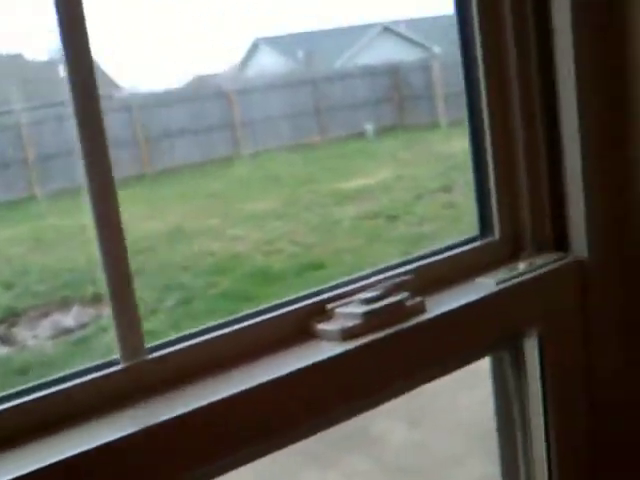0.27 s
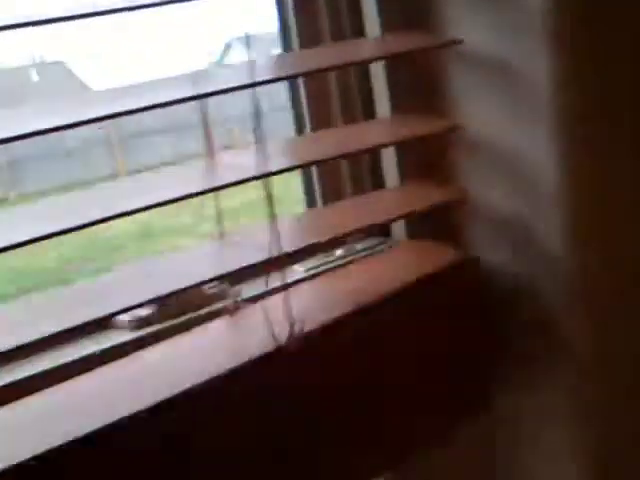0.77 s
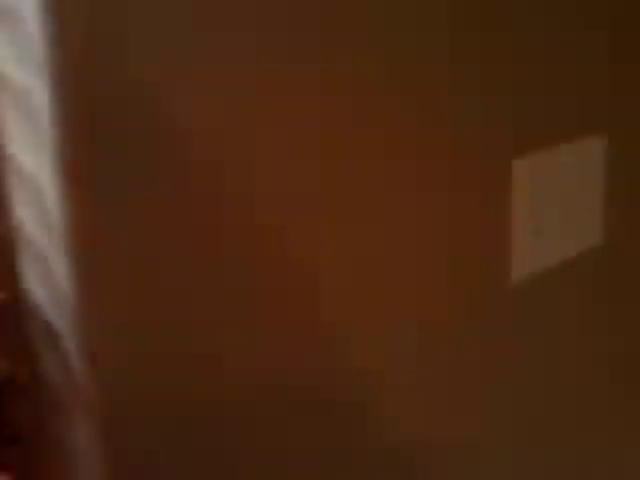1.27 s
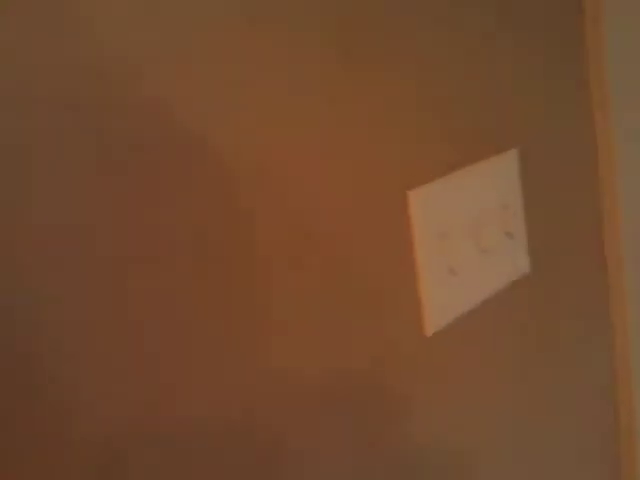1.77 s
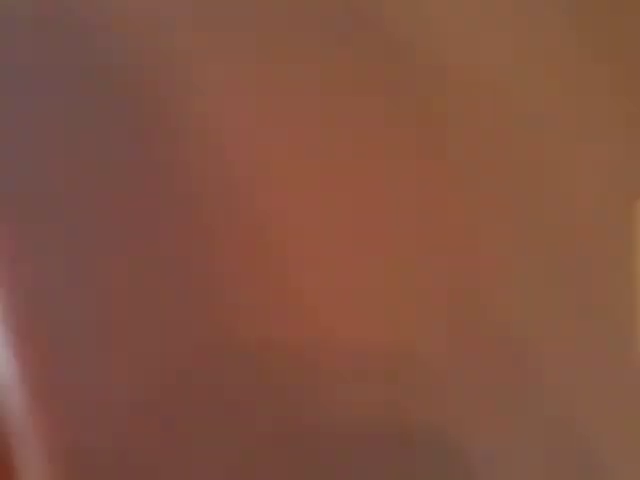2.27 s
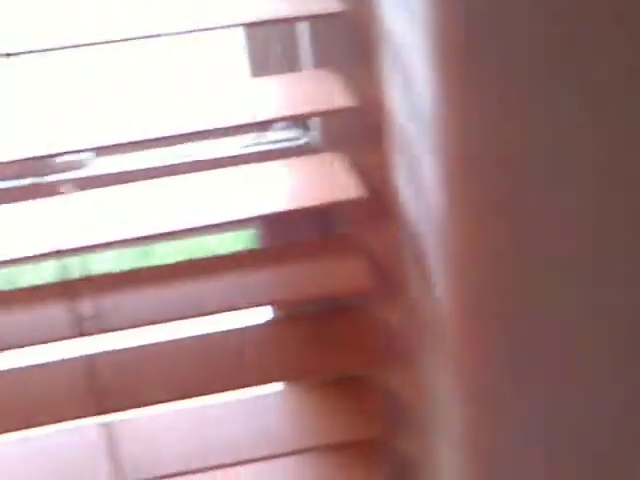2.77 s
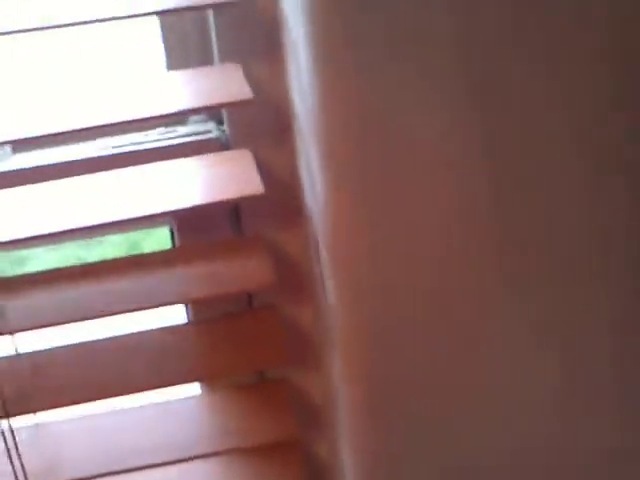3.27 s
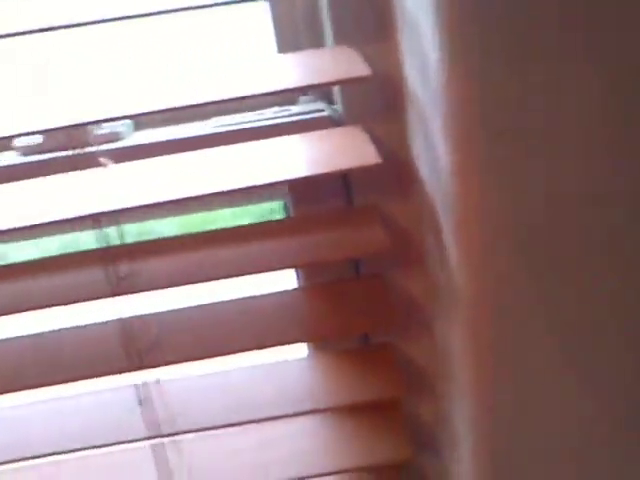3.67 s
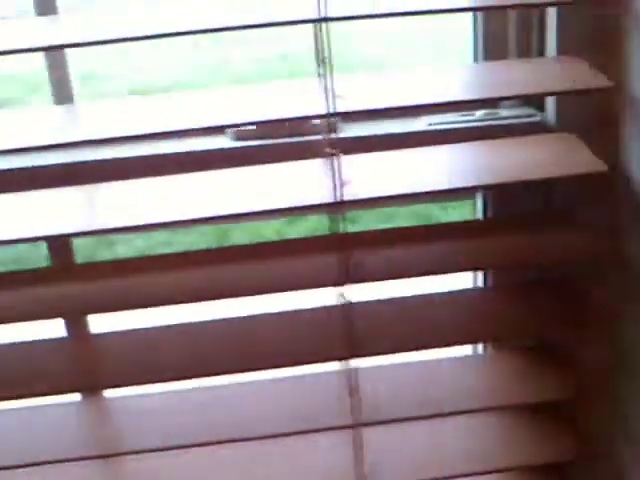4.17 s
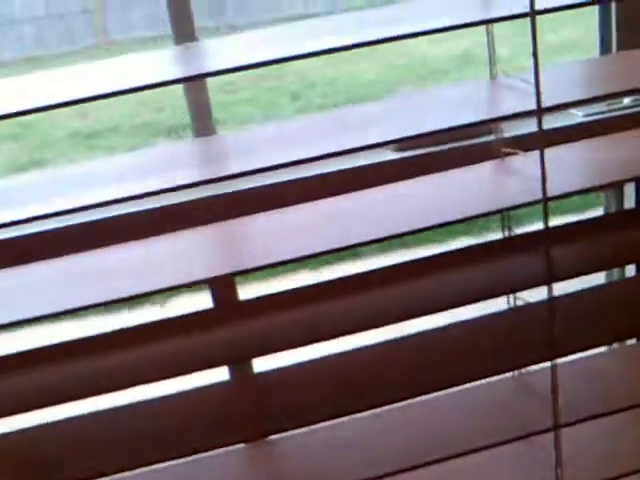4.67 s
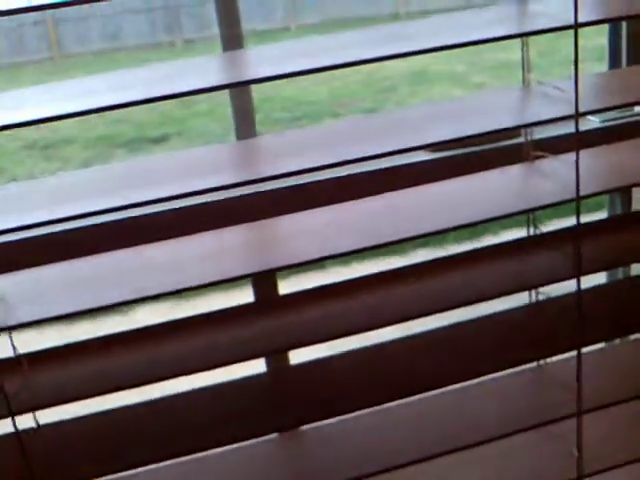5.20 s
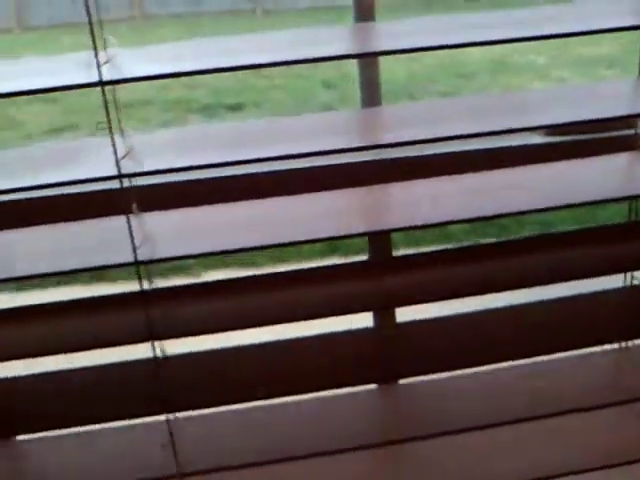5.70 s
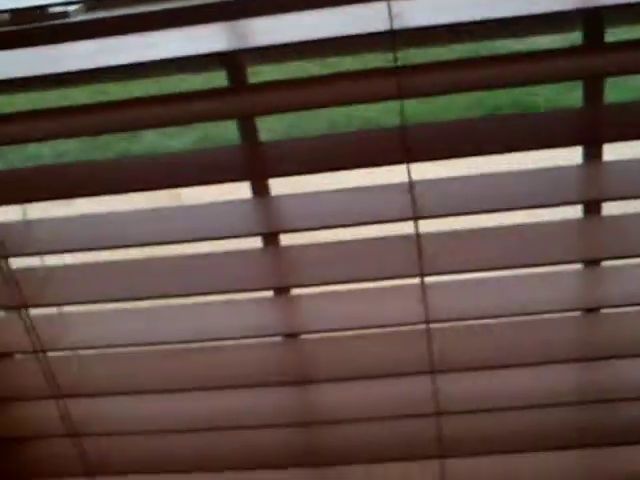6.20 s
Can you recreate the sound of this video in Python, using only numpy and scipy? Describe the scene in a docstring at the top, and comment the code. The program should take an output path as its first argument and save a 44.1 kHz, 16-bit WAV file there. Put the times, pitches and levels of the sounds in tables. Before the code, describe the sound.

Wide-slatted blinds are handled close to the microphone in a bare, echoing room. A long cord pull whirrs up and down with clattering slats, then faint rubbing and metallic clinks. A shorter, rougher pull rattles, lighter rubbing follows, the rail lands with a shiver of slats, and a very loud hard clack bounces quickly before fading into steady hiss.

```python
"""Wide-slatted window blinds are worked by their cord in a small room, close to the microphone.
The braided cord whirrs over its roller and rubs in tiny slips that sound the head rail; rough tones squeal briefly.
Slats tick in short resonant cracks, the metal cord lock clinks with beating modes, dull bumps reach the frame.
The bottom rail lands with a shiver of slats, then the blind is caught with a sharp, bouncing clack.
Bare walls return a dense echo, over steady microphone hiss."""
import sys
import numpy as np
from scipy import signal
from scipy.fft import rfft, irfft, next_fast_len
from scipy.io import wavfile
from scipy.ndimage import uniform_filter1d

SR = 44100
rng = np.random.default_rng(int(sys.argv[2]) if len(sys.argv) > 2 else 0)


def master(y):
    """Save y as 16-bit WAV."""
    cut = np.clip(np.atleast_2d(y).T, -1, 1)
    pcm = np.round(cut * 32767)  # scale
    wavfile.write(sys.argv[1], SR, pcm.astype(np.int16))


N = 284092  # samples
TIME = np.arange(N) / SR  # s
HIT_SIZE = 8192  # samples in one contact


def undb(db):
    """Decibels to gain."""
    return 10 ** (np.asarray(db) / 20)


def unit(x):
    """Scale to rms 1."""
    return x / np.sqrt(np.mean(x ** 2))


def decay(t, t60):
    """Exponential fade that loses 60 dB in t60 seconds."""
    return np.exp(-np.log(1000) * t / t60)


def gains(points, size):
    """Gain of a (Hz, dB) outline at every bin of a transform."""
    hz, db = np.transpose(points)
    log_f = np.log(np.fft.rfftfreq(size, 1 / SR) + 1)
    return undb(np.interp(log_f, np.log(hz), db))


def colour(x, points, resonances=()):
    """Causal filter with a (Hz, dB) outline and (Hz, width in Hz, dB) resonances standing on it."""
    size = 2 * next_fast_len(len(x) // 2 + 1, real=True)
    f = np.fft.rfftfreq(size, 1 / SR)
    peaks = sum(undb(db) / (1 + (2 * (f - hz) / width) ** 2) for hz, width, db in resonances)
    # folding the cepstrum makes every resonance ring after the blow, never before it
    cepstrum = irfft(np.log(gains(points, size) * (1 + peaks)), size)
    cepstrum[1:size // 2] *= 2
    cepstrum[size // 2 + 1:] = 0
    response = np.exp(rfft(cepstrum))
    return irfft(rfft(x, size) * response, size)[:len(x)]


def walk(rate):
    """Smooth chance that changes about rate times a second, rms 1."""
    k = max(int(SR / rate), 1)
    held = np.repeat(rng.standard_normal(N // k + 1), k)
    smooth = uniform_filter1d(uniform_filter1d(held, k), k)
    return unit(smooth[:N])


def swell(s, db):
    """Gain along a level curve, all but silent outside it."""
    return uniform_filter1d(undb(np.interp(TIME, s, db, left=-120, right=-120)), size=600)


def add(track, s, sound):
    """Mix a sound into a track at time s."""
    start = max(int(s * SR), 0)
    track[start:start + len(sound)] += sound[:N - start]


def blow(x):
    """Scale a blow to the energy of one millisecond at full level."""
    return x * np.sqrt(SR / 1000 / np.sum(x ** 2))


def crack(points, snap_t60, resonances=(), ring_t60=.04, ring_share=.2):
    """One contact: a snap and the brief ring of many crowded modes, as coloured, fading noise."""
    t = np.arange(HIT_SIZE) / SR
    fade = decay(t, snap_t60) + ring_share * decay(t, ring_t60)
    return blow(colour(rng.choice([-1, 1], HIT_SIZE) * fade, points, resonances))


def grains(rate, spread_db):
    """Dense tiny contacts of uneven size, about rate a second, rms 1."""
    sizes = undb(spread_db * np.minimum(rng.exponential(size=N), 5))
    happens = rng.random(N) < rate / SR
    return unit(happens * rng.standard_normal(N) * sizes)


def rough_tone(hz, width_hz):
    """A tone whose size and phase wander, rms 1."""
    phase = 2 * np.pi * np.cumsum(hz * np.ones(N)) / SR
    return unit(walk(width_hz) * np.cos(phase) + walk(width_hz) * np.sin(phase))


# Spectrum of the hiss. Each row: frequency in Hz, level in dB.
HISS_COLOUR = [(15, -30), (25, -5.5), (161, -9), (277, -9.5), (416, -6), (489, -7), (641, -5), (2220, -7),
               (2840, -5.5), (7710, -6.5), (8360, -8), (10100, -9), (16000, -12)]


def hiss(level_db=-57.5):
    """Steady microphone hiss over the quiet of the house: coloured noise."""
    return undb(level_db) * unit(colour(rng.standard_normal(N), HISS_COLOUR))


GRIP_S, LET_GO_S = 0.18, 0.097  # the cord takes this long to come under load and to go slack
HAUL_DB, EASE_S = .8, 0.04  # the cord presses harder speeding up, lighter slowing down; ease between them
RUB_DB_PER_OCTAVE, HOLLOW_DB_PER_OCTAVE, WHIRR_DB_PER_OCTAVE = 11, 10.5, 52  # per doubling of cord speed


def stroke(start, fastest, end, top_hz, hz_per_s):
    """One pull: the hand speeds up and slows down evenly. Returns the cord's speed and the load on it (0-1)."""
    # never slower than a tenth of top speed
    speed = np.maximum(top_hz - hz_per_s * np.abs(TIME - fastest), top_hz / 10)
    load = np.clip((TIME - start) / GRIP_S, 0, 1) * np.clip((end - TIME) / LET_GO_S, 0, 1)
    return speed, np.sin(np.pi / 2 * load) ** 2


def drive(motion, db, db_per_octave):
    """Gain of a sound driven by a pull: db at top speed and full load, weaker as the cord slows."""
    speed, load = stroke(*motion)
    fastest = motion[1]
    haul_db = HAUL_DB * np.tanh((fastest - TIME) / EASE_S)
    return load * undb(db + haul_db + db_per_octave * np.log2(speed / speed.max()))


# Pulls of the cord, its speed counted in strands of the braid passing the roller a second. Each row:
# start, fastest moment and end in seconds, top speed in Hz, acceleration in Hz per second, then levels in dB
# of rubbing, hollow head rail and whirr (cord and whirr trim these), jerkiness 0-1.
STROKES = [ (0.063, 0.6, 1.426, 859, 707, -35.5, -40, -32.5, .2),
           (1.41, 1.668, 2.15, 398, 147.2, -53, -61.5, -69.5, 0.96),
           (1.913, 2.093, 2.17, 519, 704, -48, -58.5, -63, 0.96),
           (2.583, 2.722, 2.98, 361, 250, -56.5, -67.5, -83, 0.8),
           (2.925, 3.243, 3.623, 897.6, 1300, -37.5, -45.5, -39, 0.67),
           (4.17, 4.37, 4.53, 798, 600, -50, -58.5, -66, 0.9),
           (4.528, 4.99, 5.1, 923, 348, -49, -56, -54.5, 1)]
# Spectra of the rubbing cord and the hollow rail. Each row: frequency in Hz, level in dB.
CORD_COLOUR = [(710, -32.5), (1200, -10.5), (1340, -4), (2200, -8), (3830, -3), (5710, 0), (7660, -4),
               (8260, -6), (8820, -6.5), (10500, -10.5), (16000, -22.5)]
HOLLOW_COLOUR = [(100, -28.5), (290, -13.5), (520, -13.5), (760, 0), (1080, 3), (1400, -4), (2000, -10.5),
                 (4000, -61.5)]
# Resonances of the head rail. Each row: frequency in Hz, width in Hz, strength in dB.
HEAD_RAIL = [(885, 21, -20), (1910, 640, -3), (2224, 310, 5), (3440, 190, -7), (5620, 510, -6)]


def cord(rub_trim_db=-1.0, hollow_trim_db=-2.0, flutter_db=1.33, drag_db=1.0):
    """The cord rubs through its guides in tiny slips that sound the head rail; it drags unevenly."""
    rub = unit(colour(grains(rate=4500, spread_db=2.0), CORD_COLOUR, HEAD_RAIL))
    hollow = unit(colour(grains(rate=4000, spread_db=3.0), HOLLOW_COLOUR, HEAD_RAIL))
    out = np.zeros(N)
    for *motion, rub_db, hollow_db, _, _ in STROKES:
        out += rub * drive(motion, rub_db + rub_trim_db, RUB_DB_PER_OCTAVE)
        out += hollow * drive(motion, hollow_db + hollow_trim_db, HOLLOW_DB_PER_OCTAVE)
    unevenness_db = flutter_db * walk(rate=130) + drag_db * walk(rate=50)
    return out * undb(unevenness_db)


def whirr(trim_db=-2.5):
    """Strands of the braid bump over the roller: a tone that follows the speed and blurs in a jerky pull."""
    out = np.zeros(N)
    for *motion, _, _, db, jerk in STROKES:
        pitch, _ = stroke(*motion)
        clear = np.sqrt(1 - jerk) * rough_tone(pitch, width_hz=96)
        blurred = np.sqrt(jerk) * rough_tone(pitch, width_hz=330)
        out += (clear + blurred) * drive(motion, db + trim_db, WHIRR_DB_PER_OCTAVE)
    return out


MID_SLAT_HZ, BODY_DB_PER_OCTAVE = 3500, -11.5  # a tap above the middle pitch has less hollow body
DULL_RATIO = 1.97  # a tap has little treble beyond this multiple of its resonance
# Spectra of a tap, its hollow body and its sharp edge. Each row: frequency in Hz, level in dB.
TAP_COLOUR = [(900, -31.5), (1700, -8.5), (3300, -4), (5000, -5.5), (6800, -2), (8500, -8), (12000, -39.5)]
BODY_COLOUR = [(100, -35), (280, -15), (480, -8), (800, -0.5), (1350, 3), (1800, 0.5), (3000, -20)]
EDGE_COLOUR = [(5000, -65), (8000, 1.5), (9500, 2), (11500, -1), (16000, -14)]


def tap(hz, edge_db, mid_body_db=-13.5, width=0.19, resonance_db=5):
    """Slat on slat: a dry tap pitched by where it lands, with a hollow body and a sharp edge."""
    body_db = mid_body_db + BODY_DB_PER_OCTAVE * np.log2(hz / MID_SLAT_HZ)
    dulled = [(f, db - 10 * np.log10(1 + (f / (DULL_RATIO * hz)) ** 6)) for f, db in TAP_COLOUR]
    resonance = [(hz, width * hz, resonance_db)]
    out = crack(dulled, snap_t60=0.02, resonances=resonance, ring_t60=0.065, ring_share=0.5)
    out += undb(body_db) * crack(BODY_COLOUR, snap_t60=0.04, ring_t60=0.09, ring_share=0.35)
    out += undb(edge_db) * crack(EDGE_COLOUR, snap_t60=0.013, ring_t60=0.027, ring_share=0.34)
    return out


JOSTLE_HZ, JOSTLE_OCTAVES, JOSTLE_EDGE_DB = 3100, .8, -1  # middle resonance, spread either way, sharp edge
# Spectrum of the low knocks. Each row: frequency in Hz, level in dB.
KNOCK_COLOUR = [(60, -16), (160, -11), (380, 1), (600, -3.5), (1500, -28.5)]


def jostle(count=80, over_rub_db=3.5, spread_db=1.0, knock_db=-12.5):
    """The running cord shakes the slats into small taps and low knocks that follow the strength of rubbing."""
    rubbing = sum(drive(motion, db, RUB_DB_PER_OCTAVE) for *motion, db, _, _, _ in STROKES)
    out = np.zeros(N)
    for k, (when, size, spot, weight) in enumerate(rng.random((count, 4))):
        at = int((k + when) / count * N)  # one at random in each equal span
        hz = JOSTLE_HZ * 2 ** (JOSTLE_OCTAVES * (2 * spot - 1))
        touch = tap(hz, JOSTLE_EDGE_DB)
        knock = undb(knock_db) * 2 * weight * crack(KNOCK_COLOUR, snap_t60=0.038)
        gain = rubbing[at] * undb(over_rub_db + spread_db * (2 * size - 1.5))
        add(out, at / SR, gain * (touch + knock))
    return out


# Modes of the lock's metal. Each row: frequency in Hz, t60 in seconds, relative spread of pitch.
LOCK_MODES = [(3950, .006, .06), (8780, .042, .009), (13450, .04, .012)]


def lock_ring(mode_db):
    """The lock's metal modes, each a close, beating pair that differs from touch to touch."""
    t = np.arange(HIT_SIZE) / SR
    out = 0
    for (hz, t60, spread), db in zip(LOCK_MODES, mode_db):
        pitch, turn = rng.standard_normal((2, 2, 1))
        pair = np.sin(2 * np.pi * (hz * (1 + spread * pitch) * t + turn)).sum(axis=0)
        onset = 1 - np.exp(-t / 0.00041)
        out = out + undb(db) * blow(pair * decay(t, t60) * onset)
    return out


HARD_CLINK_DB = -20
HIGH_MODE_DB, HIGH_MODE_DB_PER_DB = -8.5, .6  # high mode in a hard clink, and its extra loss in softer ones
# The cord lock clinking. Each row: start in seconds, level in dB, ring of its low mode in dB.
CLINKS = [(0.1394, -34, -26), (1.551, -40, -19), (1.612, -37, -3.5), (1.6455, -39, -14),
          (2.143, -26.5, -20), (2.1519, -18, -5), (2.158, -19.5, -17), (2.1672, -20, -30),
          (2.269, -27.5, -7), (2.2783, -24.5, -20), (2.299, -24, 0), (2.337, -39, -17), (2.37, -33.5, -26),
          (2.6312, -32.5, -27), (2.84, -42.5, 1.5), (5.3405, -36.5, 2), (5.366, -34, 5), (5.6012, -40, 2),
          (5.6623, -34, -20), (5.6676, -23.5, -17), (6.261, -44.5, -1)]
# Spectrum of its click. Each row: frequency in Hz, level in dB.
CLINK_COLOUR = [(80, -56), (400, -23.5), (1500, -26.5), (2900, -12), (4000, -3.5), (5200, 0.5), (7000, 1.5),
                (9500, -5.5), (11500, -16.5), (13500, -28.5), (16000, -9)]


def lock(middle_db=1.0, buzz_db=-9.5):
    """The loose metal catch clicks and buzzes on in its housing; harder touches wake its highest mode."""
    out = np.zeros(N)
    for s, db, low_db in CLINKS:
        click = crack(CLINK_COLOUR, snap_t60=0.03, ring_t60=0.041, ring_share=0.5)
        buzz = undb(buzz_db) * crack(CLINK_COLOUR, snap_t60=1.0)
        high_db = HIGH_MODE_DB + HIGH_MODE_DB_PER_DB * (db - HARD_CLINK_DB)
        add(out, s, undb(db) * (click + buzz + lock_ring([low_db, middle_db, high_db])))
    return out


# The louder taps. Each row: start in seconds, level in dB, main resonance in Hz, sharp edge in dB. The row at
# 5.366 s is the broad rattle that sounds with the lock's clink at that moment.
TAPS = [(0.5302, -18.5, 3000, -9.5), (0.6377, -16.5, 4900, -16), (0.6962, -20.5, 4600, -24),
        (0.7012, -20.5, 1910, -25), (0.7417, -23, 4140, -4.5), (0.7865, -26.5, 1610, -8),
        (0.8656, -27.5, 4300, -6), (0.9279, -33, 1500, -6), (1.2629, -29.5, 4550, -10.5),
        (1.427, -40, 2260, -16), (1.46, -42.5, 3820, -5), (1.549, -29, 2600, -22), (1.8788, -41, 1700, -28),
        (2.047, -31, 4160, -11), (2.5145, -48, 1110, 0), (3.1564, -19.5, 6360, -4),
        (3.2269, -23, 3340, -6.5), (3.2456, -24, 7400, -7), (3.315, -26, 3300, -7),
        (3.3427, -16.5, 3650, -6), (3.3825, -22.5, 6460, -1.5), (3.505, -30.5, 3470, -8),
        (3.543, -33.5, 3500, -11.5), (4.115, -53, 1200, -25), (4.2122, -29.5, 5700, -12),
        (4.214, -32, 2220, -16), (4.26, -35.5, 3580, -11), (4.2683, -26, 3670, -15),
        (4.8636, -32.5, 3240, -20), (4.958, -30, 5730, -6.5), (5.005, -18, 2820, -17),
        (5.0258, -23.5, 3600, -4), (5.039, -24.5, 1300, -22), (5.058, -17.5, 4600, -8),
        (5.0873, -19.5, 5100, -5.5), (5.0975, -27.5, 1370, -25), (5.285, -39, 4500, 1),
        (5.366, -31.5, 3420, -18), (6.348, -42.5, 2170, -30)]


def slats():
    """The slats tap each other as they gather and part; one tap is the broad rattle under a clink of the lock."""
    out = np.zeros(N)
    for s, db, hz, edge_db in TAPS:
        add(out, s, undb(db) * tap(hz, edge_db))
    return out


# Brief squeals, scrapes and rubbing swells of cord and slats. Each row: start and end in seconds,
# pitch in Hz, width in Hz, start level and end level in dB.
SQUEAKS = [(1.042, 1.197, 5480, 3000, -44, -67), (2.974, 3.16, 5720, 895, -61, -52),
           (3.33, 3.56, 810, 160, -53, -61), (4.211, 4.407, 2214, 500.4, -46.5, -65),
           (5.672, 5.74, 3150, 200, -40, -44)]


def squeals_and_scrapes():
    """Brief squeals, scrapes and rubbing swells of cord and slats: rough tones that change level evenly in dB."""
    return sum(rough_tone(hz, width) * swell([start, end], [start_db, end_db])
               for start, end, hz, width, start_db, end_db in SQUEAKS)


# Dull bumps against the window frame. Each row: start in seconds, level in dB, t60 in seconds.
BUMPS = [(3.117, -57, 0.063), (4.222, -65, 0.058), (5.047, -49.5, 0.22), (5.10, -46, 0.26),
         (5.16, -53, 0.42), (5.748, -43, 0.1)]
# Spectrum of a bump. Each row: frequency in Hz, level in dB.
BUMP_COLOUR = [(25, -23), (70, -2), (130, -1), (220, -7), (450, -9), (1000, -72)]


def bumps():
    """The weight of the blind bumps softly against the frame: low, fading noise."""
    out = np.zeros(N)
    for s, db, t60 in BUMPS:
        rumble = unit(colour(rng.standard_normal(2 * HIT_SIZE), BUMP_COLOUR))
        add(out, s, undb(db) * rumble * decay(TIME[:len(rumble)], t60))
    return out


def shiver(start=5.005, peak_s=5.067, end=5.24, start_db=-40, peak_db=-34.0, end_db=-55, bright_db=-2,
           landing_db=-18):
    """The rail lands with a hollow knock, then the whole stack of slats chatters and settles."""
    contacts = grains(rate=900, spread_db=2.5)
    hollow = unit(colour(contacts, BODY_COLOUR, [(445, 150, 2.5), (1164, 200, -3)]))
    bright = undb(bright_db) * unit(colour(contacts, TAP_COLOUR))
    out = (hollow + bright) * swell([start, peak_s, end], [start_db, peak_db, end_db])
    landing = crack(BODY_COLOUR, snap_t60=0.047, ring_t60=0.057, ring_share=0.25)
    add(out, start, undb(landing_db) * landing)
    return out


REBOUND_S, REBOUND_DB = .003, -7.5  # each blow touches a second time, just after and softer
# The rail clacking and bouncing. Each row: start in seconds, level in dB, main resonance in Hz,
# metal ring in dB (rail trims both levels).
CLACKS = [(5.6808, -18, 4840, -14), (5.7039, -16.5, 3300, -2), (5.7262, -26.5, 4460, -18),
          (5.749, -0.5, 4100, -7), (5.7598, -6, 5430, -0.5), (5.782, -15, 1980, 0.5),
          (5.7886, -16, 2100, -11), (5.8045, -10.5, 3280, -1.5), (5.8222, -18, 3600, -9),
          (5.8512, -13, 2500, -30)]
# Spectra of the clack and of its dull body. Each row: frequency in Hz, level in dB.
CLACK_COLOUR = [(400, -31), (1000, -18), (1600, -10), (2000, -2.5), (3000, 1.5), (4200, -0.5), (5600, 2),
                (6800, -2.5), (10500, -6), (12500, -15.5), (16000, -30)]
THUD_COLOUR = [(60, -25), (130, -34), (260, -10.5), (450, -5.5), (650, -3), (850, -4), (1300, 3.5),
               (2500, -22)]
# Resonances of the rail. Each row: frequency in Hz, width in Hz, strength in dB.
RAIL_MODES = [(1445, 160, 12.5), (2000, 450, 6.5), (2680, 700, -4.5), (4320, 500, 0), (5350, 450, -4)]


def rail(trim_db=-1.5, body_db=-17.5, metal_trim_db=-4.5, width=0.26, resonance_db=7.5):
    """The rail strikes hard and bounces, each time on another spot; every blow also shakes the lock."""
    out = np.zeros(N)
    for s, db, hz, ring_db in CLACKS:
        modes = RAIL_MODES + [(hz, width * hz, resonance_db)]
        for touch in range(2):
            clack = crack(CLACK_COLOUR, snap_t60=0.011, resonances=modes, ring_t60=0.032, ring_share=0.098)
            clack += undb(body_db) * crack(THUD_COLOUR, snap_t60=0.013, ring_t60=0.15, ring_share=0.5)
            clack += undb(ring_db + metal_trim_db) * lock_ring(mode_db=[-18, 0, -13])
            add(out, s + touch * REBOUND_S, undb(db + trim_db + touch * REBOUND_DB) * clack)
    return out


# The room's echo. Each row: band centre in Hz, t60 in seconds, level in dB.
ROOM = [(150, 0.65, -19), (400, 0.42, -6), (905, 0.63, -5), (1750, 0.59, -7), (2660, 0.71, -6.5),
        (4450, 0.63, -9), (6360, 0.53, -9.5), (9300, 0.45, -12.5), (14000, 0.4, -11)]


def room(x, build_s=0.0038):
    """Bare walls return a dense echo that builds quickly and dies soonest in the high treble."""
    t = TIME[:SR]
    log_f = np.log(np.fft.rfftfreq(SR, 1 / SR) + 1)
    centres = np.log([row[0] for row in ROOM])
    noise, response = rfft(rng.standard_normal(SR)), 0
    # each row of the identity picks one band, crossfading into its neighbours
    for share, (_, t60, db) in zip(np.eye(len(ROOM)), ROOM):
        fade = decay(t, t60) * (1 - np.exp(-(t / build_s) ** 2))
        band = irfft(noise * np.interp(log_f, centres, share), SR)
        response = response + undb(db) * band * fade / np.sqrt(np.sum(fade ** 2))
    return signal.fftconvolve(x, response)[:N]


def scene():
    """The blind, its echo and the background, on one channel."""
    rubbing = cord() + whirr() + squeals_and_scrapes()
    contacts = jostle() + lock() + slats() + bumps() + shiver() + rail()
    blind = rubbing + contacts
    return (blind + room(blind) + hiss())[None]


def record(dry, notch_hz=8200, notch_width_hz=650, ceiling=.78, top_hz=15900):
    """The microphone has a narrow notch in the treble, rounds the hardest peaks and cuts the top."""
    notched = signal.lfilter(*signal.iirnotch(notch_hz, notch_hz / notch_width_hz, fs=SR), dry)
    rounded = notched / (1 + (notched / ceiling) ** 6) ** (1 / 6)
    # only the rounding's effect above the bass is kept: a rough edge on the loudest clacks
    above_bass = signal.butter(2, 600, "high", fs=SR, output="sos")
    rough_edge = signal.sosfilt(above_bass, rounded - notched)
    top_cut = signal.ellip(10, .2, 90, top_hz, fs=SR, output="sos")
    return signal.sosfilt(top_cut, notched + rough_edge)


dry = scene()
out = record(dry)
master(out)
```